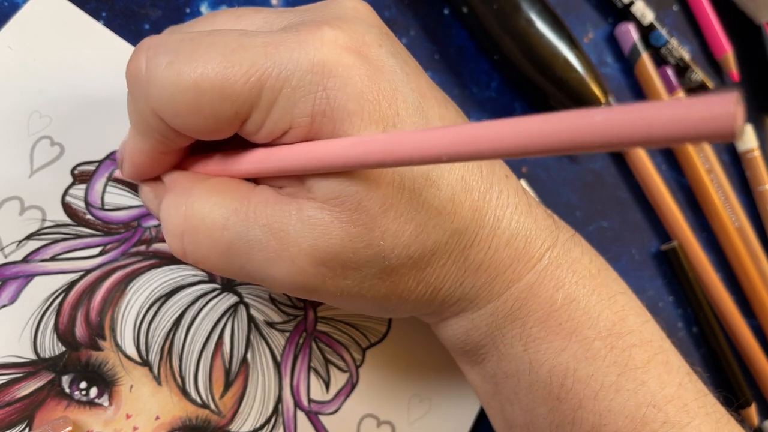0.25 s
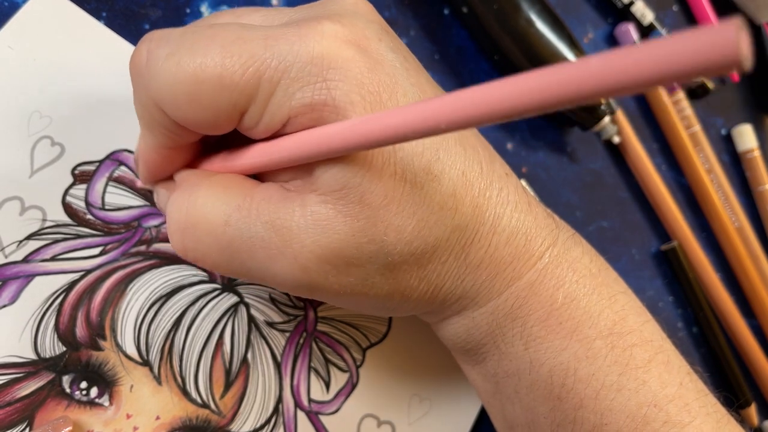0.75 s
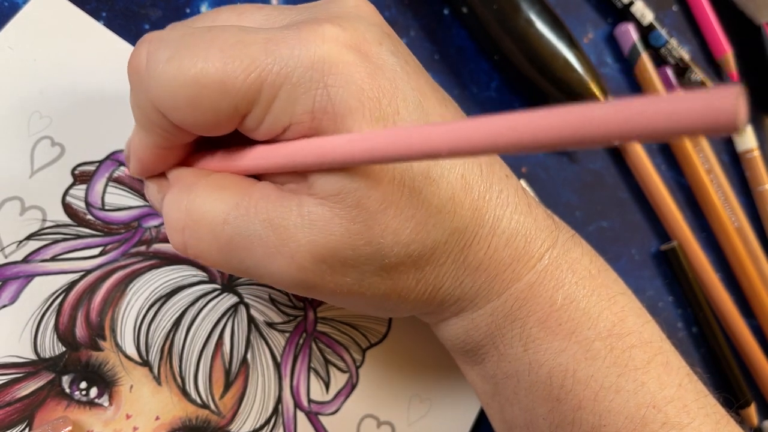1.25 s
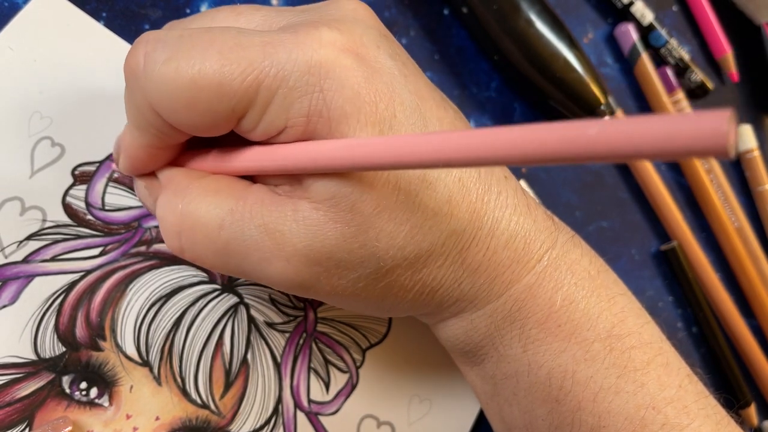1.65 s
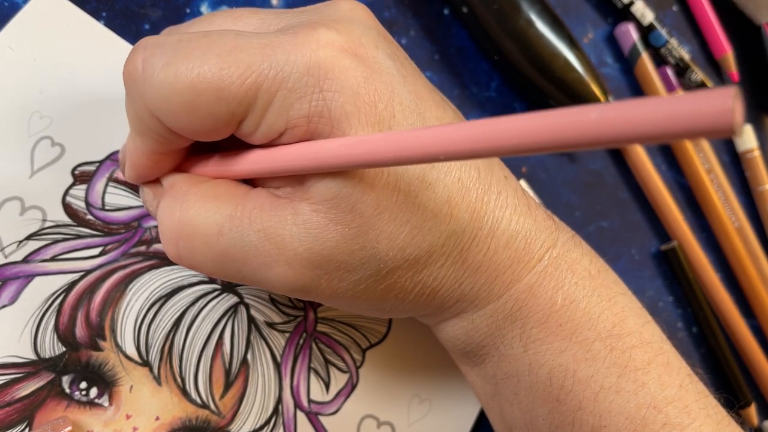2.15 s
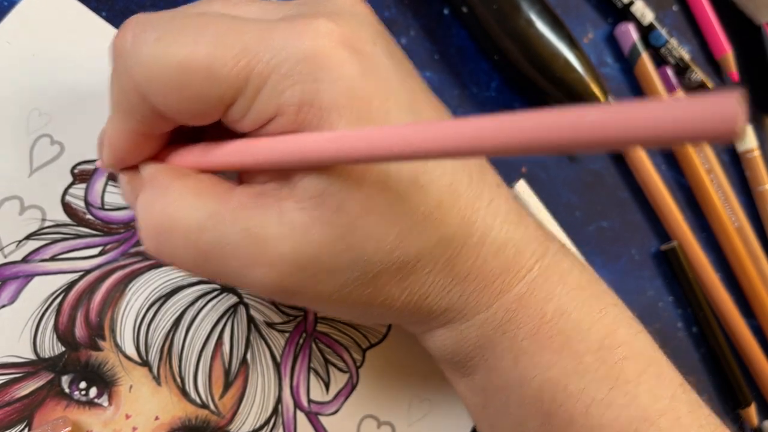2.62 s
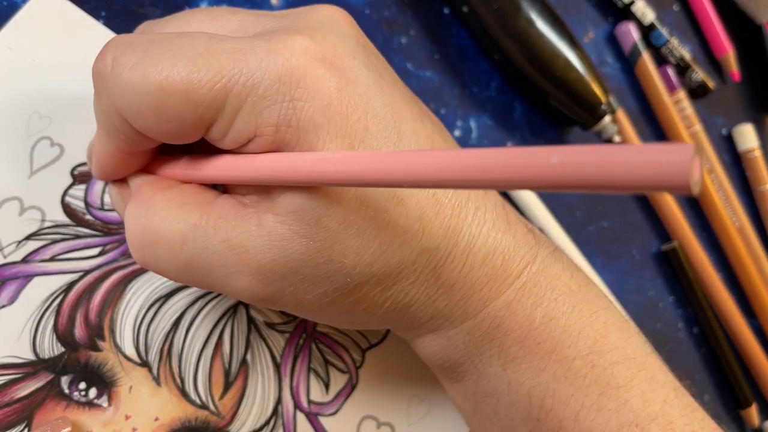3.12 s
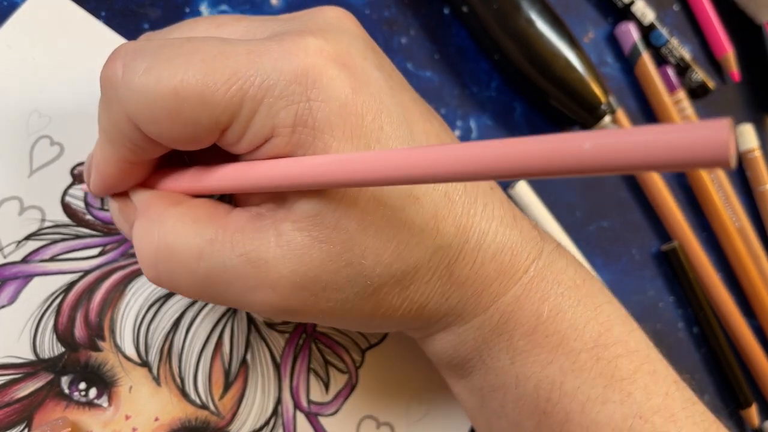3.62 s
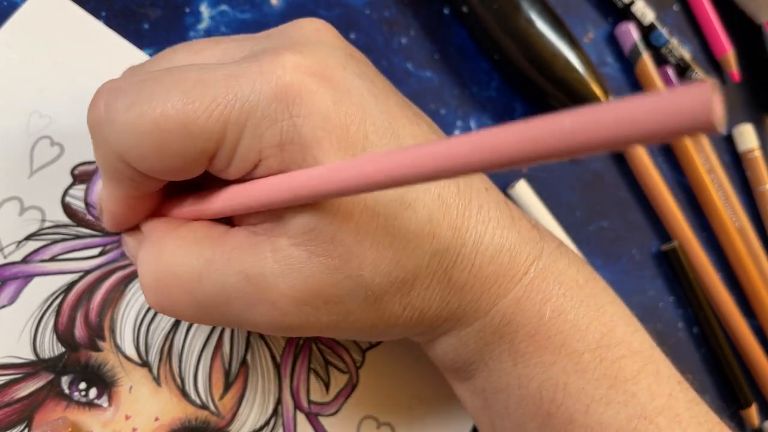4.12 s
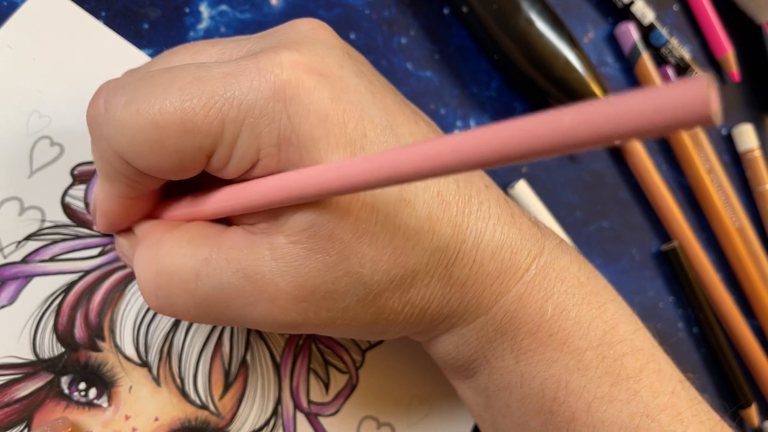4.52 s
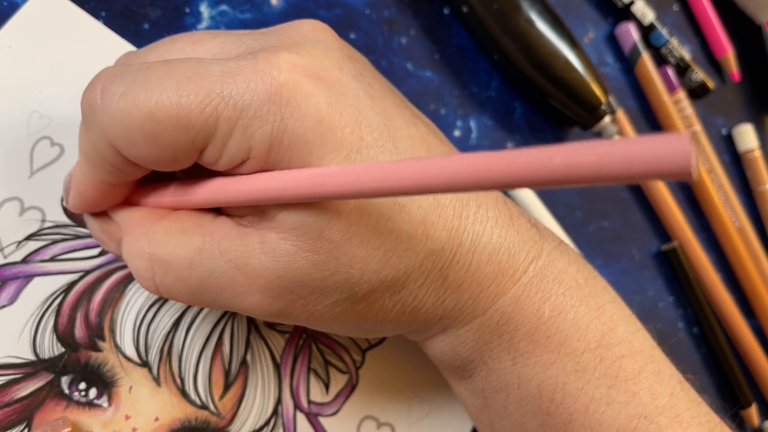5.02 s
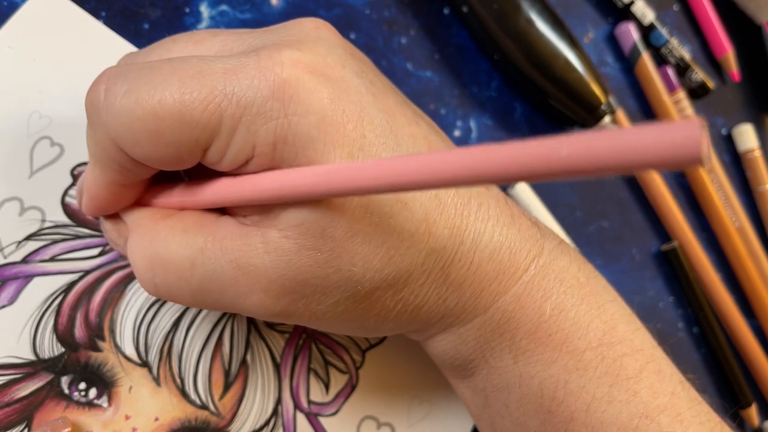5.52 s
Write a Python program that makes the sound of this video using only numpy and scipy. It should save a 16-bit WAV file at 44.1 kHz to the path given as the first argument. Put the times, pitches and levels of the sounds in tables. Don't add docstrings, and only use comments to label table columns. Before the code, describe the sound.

Soft, raspy pencil shading at about ten strokes a second, broken by brief skin rustles and one light tip click, in a quiet humming room.

```python
import sys
import numpy as np
from scipy import signal
from scipy.fft import rfft, irfft
from scipy.io import wavfile
from scipy.ndimage import uniform_filter1d

SR = 44100
rng = np.random.default_rng(int(sys.argv[2]) if len(sys.argv) > 2 else 0)


def convert_level_to_amplitude(level_db):
    exponent = np.asarray(level_db, float) / 20
    return 10 ** exponent


def put_to_file(sound):
    columns = np.atleast_2d(sound).T
    safe = np.clip(columns, -1, 1)
    whole_steps = np.round(safe * 32767)
    wavfile.write(sys.argv[1], SR, whole_steps.astype(np.int16))


N = 254016
T = np.arange(N) / SR

# centre_hz, width_hz, level_db
FIRST_GRIP = [(2210, 430, -1.8), (3100, 510, -5.4), (4090, 670, -3.4), (5170, 550, -1.8), (6630, 700, -1.8),
              (8260, 470, -6.5), (9580, 540, -4.9), (10650, 840, -9.8), (12370, 1600, -7.2),
              (13800, 380, -9.2), (15150, 1600, -7.8)]
HAND_SLIDE = [(2300, 1600, -4.3), (3240, 380, -2.6), (4650, 1600, -1.2), (7030, 600, -5.0),
              (8150, 510, -0.4), (9240, 540, -7.7), (10710, 1310, -4.9), (12980, 620, -17.7),
              (14630, 1600, -13.0)]
FLAT_GRIP = [(2190, 340, 0.8), (3140, 250, -18.1), (3860, 550, -3.8), (4780, 660, -2.9), (5540, 840, -7.7),
             (7530, 930, -12.3), (9550, 900, -10.8), (11150, 800, -10.8), (11820, 490, -7.9),
             (13460, 1250, -17.5), (15020, 830, -13.8)]
LAST_GRIP = [(2240, 410, 0.2), (3070, 340, -8.7), (4470, 980, -3.8), (5170, 440, -3.8), (6330, 850, -1.2),
             (8130, 390, -8.7), (9300, 760, -5.0), (10460, 520, -11.7), (11470, 840, -7.0),
             (12600, 520, -7.7), (13750, 470, -3.9), (14700, 450, -5.6), (15260, 680, -5.4)]
WORN_TIP = [(2240, 400, 0.5), (3080, 330, -8.9), (4140, 860, -6.5), (4840, 730, -4.4), (6370, 780, -2.9),
            (8130, 370, -14.9), (9480, 740, -7.8), (10410, 270, -13.2), (11690, 1600, -10.2),
            (12730, 390, -10.2), (13690, 510, -6.2), (14610, 360, -6.2), (15300, 940, -9.2)]
GRIP_CHANGES = [
    2.49,
    2.7,
    3.41,
    3.9,
    4.9,
]

# start_s, length_s, midstroke_db
FIRST_SHADING = [(.026, 0.04, -64.5), (.13, .055, -64.5), (.23, .056, -67.5), (.332, 0.063, -62),
                 (.435, 0.048, -66.5), (.526, 0.063, -62), (.641, 0.041, -64), (.732, 0.058, -62.5),
                 (.837, 0.049, -66.5), (.926, 0.047, -62.5), (1.023, 0.061, -60.5), (1.131, 0.067, -61),
                 (1.241, 0.056, -64), (1.338, .071, -61.5), (1.457, 0.027, -66), (1.548, 0.061, -63.5),
                 (1.652, .032, -65.5)]
FLAT_SHADING = [(2.822, 0.04, -70), (2.915, 0.06, -66), (3.02, .062, -70.5), (3.123, 0.051, -64),
                (3.23, .053, -67.5), (3.328, .055, -64)]
LAST_SHADING = [(4.012, .066, -62), (4.129, 0.063, -61), (4.223, 0.058, -63), (4.331, 0.061, -63),
                (4.431, 0.055, -63.5), (4.533, 0.063, -63), (4.64, 0.048, -63.5), (4.738, 0.053, -63.5),
                (4.832, .048, -64.5), (4.93, 0.051, -63), (5.031, .044, -64), (5.13, 0.053, -62),
                (5.227, .046, -64.5), (5.325, .054, -64), (5.424, 0.039, -64.5), (5.514, .058, -64.5),
                (5.614, 0.037, -66.5), (5.711, .042, -66)]
# start_s, length_s, midstroke_db
DABS = [(1.8, 0.028, -69.5), (1.849, .035, -66), (1.971, .035, -71), (2.036, 0.034, -68.5),
        (2.178, .032, -67.5), (2.234, .027, -67), (2.369, 0.04, -69), (2.44, .015, -72), (2.475, .01, -73)]
# start_s, length_s, midstroke_db
SLIDES = [(2.507, .06, -63), (2.562, 0.07, -60), (3.427, .06, -70.5), (3.557, 0.06, -70),
          (3.62, 0.097, -78), (3.71, 0.036, -73), (3.75, 0.14, -77), (3.87, .12, -79)]
# start_db, end_db, brightness_db
FIRST_SHAPES = (2, -4, -1.5), (-8.5, -3.5, 2.5)
FLAT_SHAPES = (-3, -4.5, -5), (-6.5, -5, -5)
LAST_SHAPES = (-3, -8, -3.5), (-3.5, -3, -1)
# start_db, end_db, brightness_db
DAB_SHAPE = (-1.5, -3.5, 0)
SLIDE_SHAPE = (-5, -7, -1)
# peak_s, half_width_s, centre_hz, width_hz, level_db
SINGING = [(1.25, 0.22, 5600, 240, 3.5), (1.59, .03, 2240, 280, 10), (3.27, .15, 2240, 180, 9),
           (2.94, .06, 2400, 190, 6), (2.975, .03, 4200, 110, 13)]

# start_s, level_db
TAPS = [
    (2.7486, -42),
    (2.7515, -58),
    (2.7578, -65),
    (2.7592, -62),
]
# pitch_hz, level_db, t60_s
TAP_MODES = [(895, -7, 0.0069), (1997, -7.5, 0.0069), (3950, -7, .008), (4230, -0.5, 0.0079),
             (2900, -13, .004), (6000, -1, 0.005), (14000, -17, .003), (7800, -7, .005), (10900, -11, .004)]

# frequency_hz, density_db (per Hz)
AIR = [(20, -75), (50, -73.5), (80, -82.5), (200, -81), (240, -89.5), (330, -83.5), (420, -84),
       (520, -91.5), (1000, -101), (1500, -106), (2200, -113), (5000, -116), (10000, -117), (16000, -119)]
# pitch_hz, level_db (rms), wander_hz
FAN = [(119, -62, 1.5), (238, -66, 2.0), (356.4, -68, 1.5), (420, -72, 5.0), (460, -63.5, 4.0),
       (1183, -89.5, .6), (1314.6, -95, .6), (1577.5, -91, .4), (1709.2, -95, .4), (1840.5, -85.5, .4)]
# time_s, pitch_hz, level_db (rms)
ENGINE = [(0, 106, -73), (1.0, 106, -55), (1.5, 106, -59.5), (2.0, 104, -50), (2.4, 106.8, -53),
          (2.9, 105, -59), (3.3, 104.5, -75), (5.76, 107.3, -70)]
# peak_s, half_width_s, change_db (over steady)
RUMBLE_SWELLS = [(0.148, 0.14, 12.5), (.7, 0.097, 9.5), (1.1, 0.24, 2), (1.9, 1, 9.5), (3.7, 0.2, 2),
                 (4.2, 0.14, -5)]
DUCT_SWELLS = [(.2, 0.62, 3.4), (.62, 0.073, 6.2), (.9, 0.11, 5.2), (1.2, 0.3, 7.6), (2, 0.36, 4),
               (2.85, 0.22, 4.8), (5, 0.54, 3.5)]
TRAFFIC_SWELLS = [(.43, 0.11, -2), (1.1, 0.24, 3), (2, 0.77, 2), (3.5, 0.48, -9.5), (5.4, .25, 4)]
GUSTS = [(.03, 0.15, 9.5), (.4, 0.17, 5), (.65, 0.095, -13), (1.08, 0.093, 11.5), (1.55, .15, 9),
         (2.6, 0.5, 6), (3.68, 0.15, -13), (4, .2, 6.5), (5.4, 0.59, 9.5)]
# frequency_hz, density_db (relative)
RUMBLE_BAND = [(90, -9.5), (108, -17), (122, -2.5), (142, 7), (165, -4.5), (185, -31.5), (400, -59.5)]
DUCT_BAND = [(230, -23), (266, -1.0), (290, 0.5), (310, -16.5), (340, -50), (600, -50.5)]
TRAFFIC_BAND = [(400, -17), (520, 0.5), (575, -1.5), (625, 2.5), (690, -0.5), (745, 3.0), (810, -4),
                (870, 1), (910, -8.0), (1000, -9.5), (1400, -20.5), (2000, -84), (4000, -46)]
DRAUGHT_BAND = [(6, 6), (15, -6.5), (25, 3.0), (55, 2.0), (70, -3.5), (90, -33.5), (200, -73)]
# peak_s, half_width_s, tyre_low_hz, tyre_high_hz, level_db
CARS = [
    (4.45, 0.44, 720, 880, -68.5),
    (5.4, 0.34, 600, 645, -65),
]
# time_s, offset (full scale 1)
DRIFT = [(.01, 0.077), (.15, 0.051), (.8, 0.00012), (1.05, -0.052), (1.4, -0.055), (1.55, -0.041),
         (2, -0.018), (2.5, 0.0049), (3.4, 0.02), (3.85, .015), (4.15, 0.022), (4.45, 0.072), (4.7, 0.034),
         (5.05, 0.003), (5.2, -0.036), (5.35, -0.053), (5.75, -.027)]


def pencil():
    effort, bright_db = strokes()
    snap_db = rng.random(N) < .5, rng.standard_normal(N), rng.exponential(size=N)
    happens, push, strength_db = snap_db
    snaps = happens * push * convert_level_to_amplitude(strength_db)
    patches = convert_level_to_amplitude(0.59 * walk(150))
    drag = level(snaps * patches, 0) * effort
    grip = np.searchsorted(GRIP_CHANGES, T)
    holds = (FIRST_GRIP, HAND_SLIDE, FLAT_GRIP, HAND_SLIDE, LAST_GRIP, WORN_TIP)
    out = 0
    for k, modes in enumerate(holds):
        held = grip == k
        tone_db = bright_db - np.average(bright_db, weights=held * effort ** 2)
        power = sum(convert_level_to_amplitude(2 * db) * width * np.pi / SR for _, width, db in modes)
        for j, (hz, width, db) in enumerate(modes):
            lean = np.clip(np.log2(hz / 8000) / 0.48, -.5, .5)
            wobble_db = 1.5 * walk(23.94)
            force = drag * held * convert_level_to_amplitude(lean * tone_db + wobble_db)
            sign = (-1) ** j
            out = out + sign * convert_level_to_amplitude(db) * ring(force, hz, width) / np.sqrt(power)
    return out + singing(snaps, effort)


def strokes():
    effort, bright_db = np.zeros(N), np.zeros(N)
    passages = ((FIRST_SHADING, FIRST_SHAPES), (DABS, [DAB_SHAPE]), (SLIDES, [SLIDE_SHAPE]),
                (FLAT_SHADING, FLAT_SHAPES), (LAST_SHADING, LAST_SHAPES))
    attack_s, release_s = 0.0062, 0.0073
    for rows, shapes in passages:
        for k, (start, length, mid_db) in enumerate(rows):
            first_db, last_db, tone_db = shapes[k % len(shapes)]
            on = slice(max(int((start - .012) * SR), 0), int((start + length + .02) * SR))
            u = (T[on] - start) / length
            v = np.clip(u, 0, 1)
            db = mid_db + first_db * (1 - v) * (1 - 2 * v) + last_db * v * (2 * v - 1)
            fade_in = np.clip(1 + u * length / attack_s, 0, 1)
            fade_out = np.clip(1 + (1 - u) * length / release_s, 0, 1)
            effort[on] += convert_level_to_amplitude(db) * fade_in * fade_out
            bright_db[on] = tone_db
    dulling_db_per_s = -5
    return effort, bright_db + dulling_db_per_s * np.maximum(T - GRIP_CHANGES[-1], 0)


def singing(snaps, effort):
    shiver = level(snaps[::-1], 0) * effort
    out = 0
    for s, half, hz, width, db in SINGING:
        out = out + convert_level_to_amplitude(db) * ring(shiver * bell(s, half), hz, width)
    return out


def taps():
    t, out = T[:2000], np.zeros(N)
    knock = sum(convert_level_to_amplitude(db) * np.sin(2 * np.pi * hz * t) * 1000 ** (-t / t60) for hz, db, t60 in TAP_MODES)
    knock = knock * (1 - np.exp(-t / 0.00037))
    push_s, push_db = 0.00098, -0.5
    knock = knock + convert_level_to_amplitude(push_db) * np.sin(np.pi * np.minimum(t / push_s, 1))
    for s, db in TAPS:
        out[int(s * SR):][:len(t)] -= convert_level_to_amplitude(db) * knock
    return out


def room():
    rumble = level(coloured(RUMBLE_BAND), swells(-59.5, RUMBLE_SWELLS) - 2.5)
    duct = level(coloured(DUCT_BAND), swells(-60, DUCT_SWELLS))
    traffic = level(coloured(TRAFFIC_BAND), swells(-62.5, TRAFFIC_SWELLS) - 2.0)
    draught = level(coloured(DRAUGHT_BAND), swells(-60.5, GUSTS) + 0.5)
    fan = sum(convert_level_to_amplitude(db) * tone(hz, wander_hz, 2.96) for hz, db, wander_hz in FAN)
    return coloured(AIR) + fan + engine() + rumble + duct + traffic + draught + cars()


def engine():
    s, hz, db = np.transpose(ENGINE)
    return convert_level_to_amplitude(np.interp(T, s, db)) * tone(np.interp(T, s, hz), 1.67, 2.5)


def cars():
    out = 0
    for s, half, low_hz, high_hz, db in CARS:
        band = [(low_hz * .95, -15), (low_hz, 0), (high_hz, 0), (high_hz * 1.03, -25), (2 * high_hz, -60)]
        out = out + level(coloured(band), db) * bell(s, half)
    return out


def pressure_drift():
    return uniform_filter1d(np.interp(T, *np.transpose(DRIFT)), size=3000, mode="nearest")


def tone(hz, wander_hz, flutter_db):
    phase = 2 * np.pi * np.cumsum(hz + wander_hz * walk(12)) / SR
    return np.sqrt(2) * convert_level_to_amplitude(flutter_db * walk(16)) * np.sin(phase)


def coloured(points):
    hz, db = np.transpose(points)
    f = np.maximum(np.fft.rfftfreq(N, 1 / SR), 1)
    gain = convert_level_to_amplitude(np.interp(np.log(f), np.log(hz), db, left=-200))
    return irfft(rfft(rng.standard_normal(N)) * gain, N) * np.sqrt(SR / 2)


def ring(x, hz, width):
    peak = signal.iirpeak(min(hz, .45 * SR), hz / width / 1.35, SR)
    return signal.lfilter(*peak, signal.lfilter(*peak, x))


def walk(rate):
    k = int(SR / rate)
    held = np.repeat(rng.standard_normal(N // k + 1), k)
    return 0.994 * uniform_filter1d(uniform_filter1d(held, k), k)[:N]


def bell(peak_s, half_s):
    return np.exp(-((T - peak_s) / half_s) ** 2)


def swells(steady_db, rows):
    return steady_db + sum(db * bell(s, half) for s, half, db in rows)


def level(x, db):
    return x * convert_level_to_amplitude(db) / np.sqrt(np.mean(x ** 2))


def scene():
    near = pencil() + taps()
    t = T[:6000]
    tail = rng.standard_normal(len(t)) * 1000 ** (-t / 0.032) * (t > .004)
    tail = tail / np.sqrt(np.sum(tail ** 2))
    near = near + convert_level_to_amplitude(-16.5) * signal.fftconvolve(near, tail)[:N]
    return (near + room() + pressure_drift())[None]


def roll_off(x):
    return signal.sosfilt(signal.butter(12, 16170, fs=SR, output="sos"), x)


def record(dry):
    top_hz = 15730
    lowpass = signal.ellip(10, .1, 40, top_hz, fs=SR, output="sos")
    mix = signal.sosfiltfilt(lowpass, dry)
    return roll_off(mix)


dry = scene()
out = record(dry)
put_to_file(out)
```